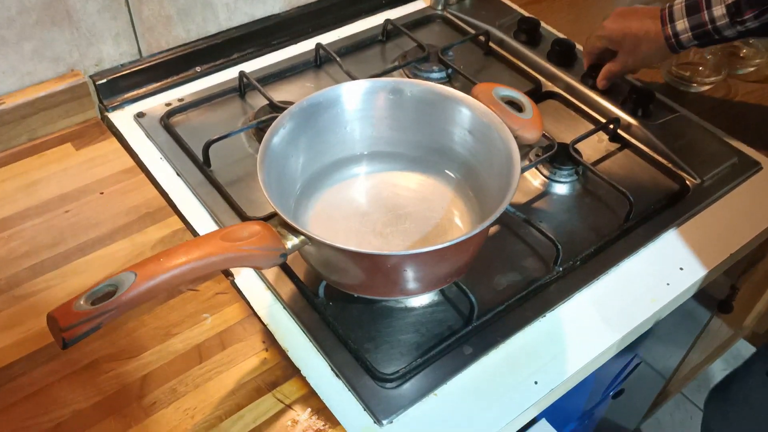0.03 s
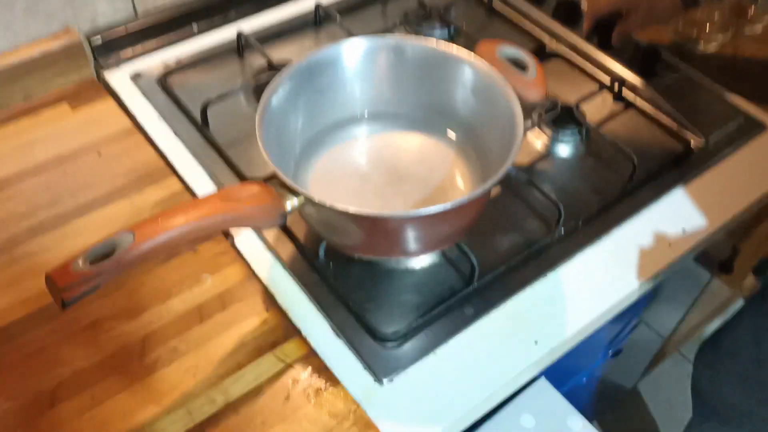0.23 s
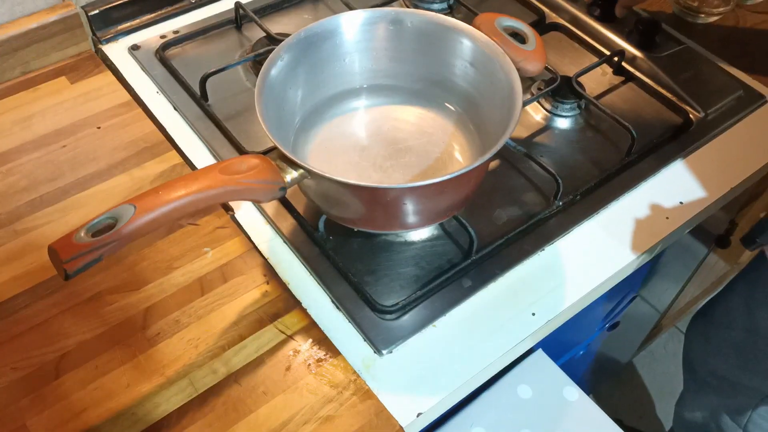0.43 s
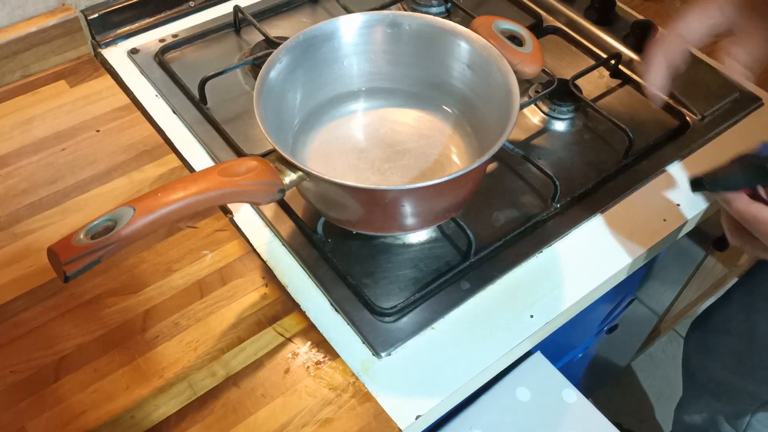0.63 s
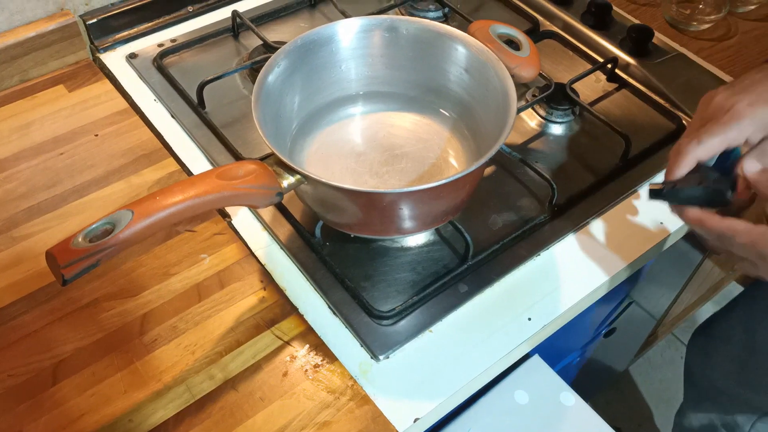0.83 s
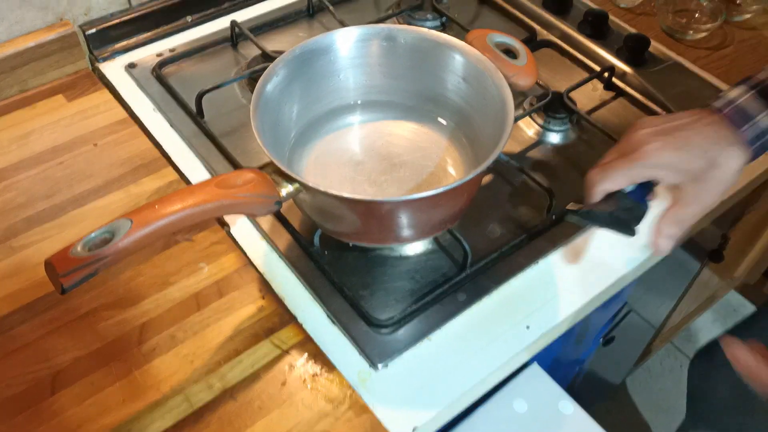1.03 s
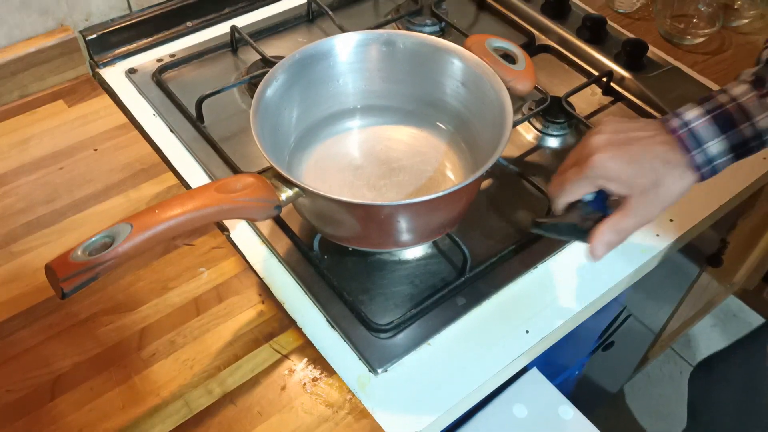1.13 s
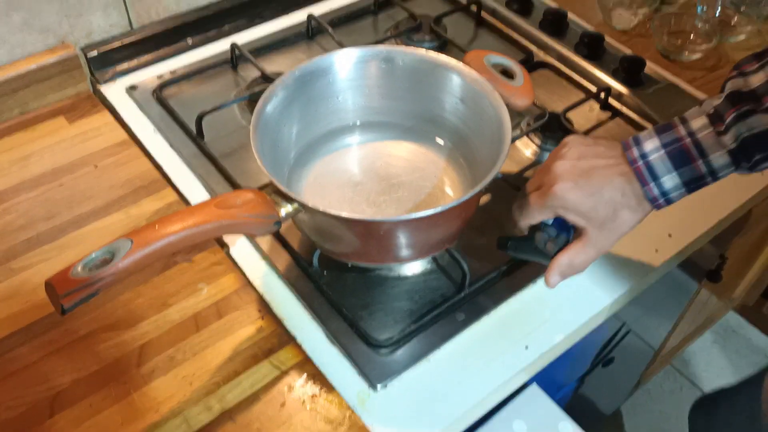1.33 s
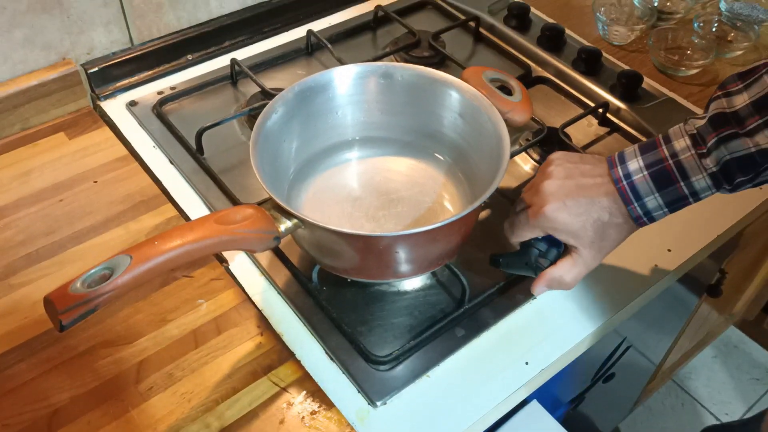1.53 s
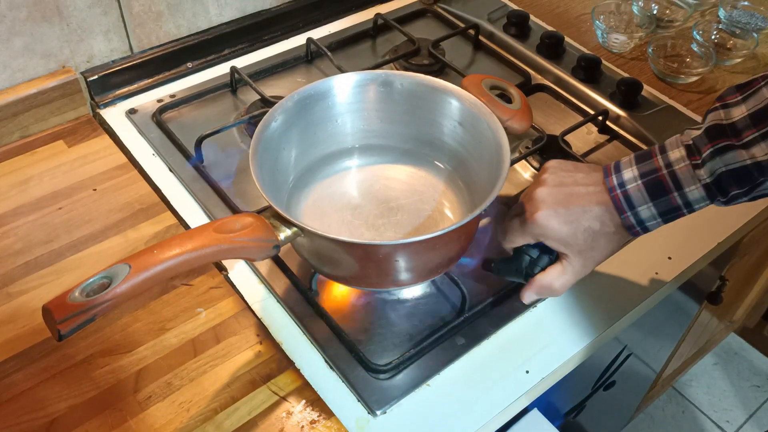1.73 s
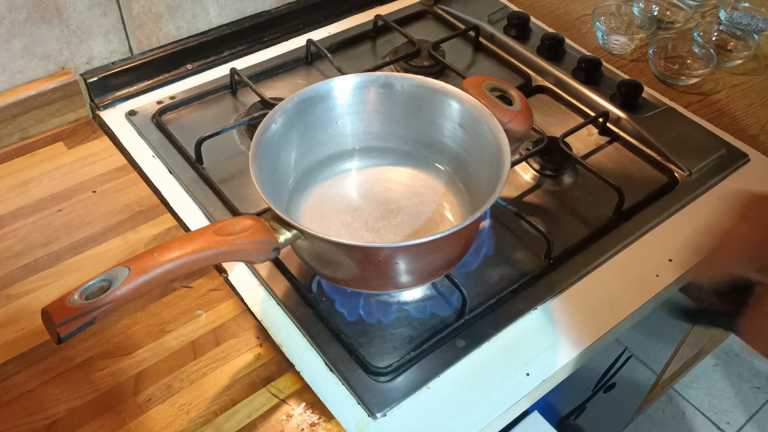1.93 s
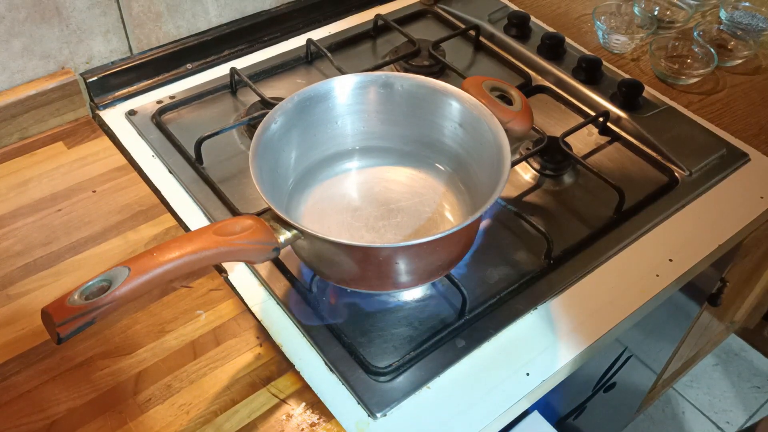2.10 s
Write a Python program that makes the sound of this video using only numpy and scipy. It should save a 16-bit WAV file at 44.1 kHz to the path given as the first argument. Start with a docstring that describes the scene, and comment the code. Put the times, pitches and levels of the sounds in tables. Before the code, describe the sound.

Gas stove ignition: knob clicks, steady gas hiss, a loud lighter snap, then a brief flaring whoosh

```python
"""In a small kitchen, a gas ring under an empty saucepan is lit.
The knob clicks open and gas hisses through the burner: coloured noise with wavering resonances.
A hand lighter is cocked and fires one sharp spark: a click with close echoes and ringing metal.
The gathered gas flares with a low whump, made of noise in the slow resonances of the air.
It settles to a soft flame: hiss whose resonances sink in pitch, over a fluttering rumble."""
import sys
import numpy as np
from scipy import signal
from scipy.fft import rfft, irfft
from scipy.io import wavfile
from scipy.ndimage import uniform_filter1d, map_coordinates

SR = 44100
rng = np.random.default_rng(int(sys.argv[2]) if len(sys.argv) > 2 else 0)


def log_audio(samples):
    """Write samples as a 16-bit WAV file to the path given in sys.argv[1]."""
    # one column per channel
    frames = np.atleast_2d(samples).T
    # limit to full scale, then quantise
    limited = np.clip(frames, -1, 1)
    pcm = np.round(limited * 32767).astype(np.int16)
    wavfile.write(sys.argv[1], SR, pcm)


N = 95432
T = np.arange(N) / SR  # time of each sample, in seconds
SIZE = 2 ** 17  # length used for filtering, in samples
HZ = np.maximum(np.arange(SIZE // 2 + 1) * SR / SIZE, 1)  # frequencies of the filters

# How the kitchen's echo fades: pitch_hz, t60_s (time to fall by 60 dB)
ROOM_FADE = [(200, .35), (1000, 0.37), (4000, 0.31), (8000, 0.29), (15000, 0.27)]
ROOM_BUILD_S = 0.00075
# How alike left and right are: pitch_hz, likeness (1 = the same, 0 = unrelated)
LIKENESS = [(150, .975), (280, .88), (600, .6), (1300, .45), (2500, .05), (15000, -.1)]
QUIET_LIKENESS, BUMP_LIKENESS = 0.48, 0.64  # share of that likeness kept by quiet noise and by bumps
# Background sound of the quiet kitchen: pitch_hz, level_db
QUIET_COLOUR = [(25, -4), (50, -1), (90, -3), (300, 0), (700, -3.5), (1500, -7.5), (3500, -5),
                (5000, -19.5), (8000, -11.5), (15000, -21.5)]
QUIET_DB = -67.5

# Clicks and knocks of knob and lighter: start_s, level_db, bass_db, treble_db, rattle_t60_s, room_db
CLICKS = [(0.0097, -23, 1.5, -4, 0.078, 6.5), (0.1223, -15.5, 10, -12, 0.027, -11),
          (0.153, -28.5, 24, -14, 0.025, -2), (0.1773, -30.5, -3, 7.5, 0.039, -0.5),
          (0.6358, -30, 6, -17, 0.02, 0), (0.7282, -13.5, 8, 3, 0.039, -4.5),
          (0.887, -25.5, 7, -24, 0.016, -12), (1.031, -34.5, 23, -21, 0.031, -4),
          (1.7558, -21, 1, 11.5, 0.014, 0.5), (2.072, -37, 1, -4, 0.02, -2)]
# Colour shared by all clicks: pitch_hz, level_db
CLICK_COLOUR = [(60, -4), (200, -11), (420, -3.5), (850, -6.5), (1500, 0.5), (2200, -3.5), (3200, 4.5),
                (5000, -5), (8000, -1.5), (11000, -8), (15000, -12.5)]
BASS_HZ, TREBLE_HZ = 586, 4930  # where the bass and treble settings take hold
RATTLE_GRAIN_DB, RATTLE_GRAIN_HZ = 4, 450

# Soft bumps of handling: start_s, level_db, t60_s
BUMPS = [(.118, -60, 0.32), (.728, -67, 0.25), (1.03, -56, 0.34), (1.42, -70, 0.57)]
# Colour of the bumps: pitch_hz, level_db
BUMP_COLOUR = [(25, -12), (60, -4), (95, 4.5), (160, -13), (400, -18), (2000, -60)]
BUMP_RISE_S = 0.03
# Hollow booms after knob and lighter are worked: start_s, level_db
BOOMS = [(0.015, -59), (.158, -71), (0.733, -66.5)]
BOOM_HZ, BOOM_WIDTH_HZ, BOOM_T60_S = 284, 186, 0.49

# Gas flow before it lights: time_s, level_db
GAS_FLOW = [(.17, -21), (.22, -4), (.335, -0.5), (.37, 3.5), (.48, 3), (.56, 2.5), (.8, 0.5), (1.0, -1.5),
            (1.2, -3), (1.4, -3.5), (1.47, 0.5), (1.55, 5.5), (1.62, -3), (1.7, -31)]
# Colour of the hiss from the jet: pitch_hz, level_db
JET_COLOUR = [(80, 1.5), (300, -3), (700, -0.5), (1300, -7), (1800, -1), (2800, -5.5), (3900, -4),
              (4300, -7.5), (4600, -21), (5200, -6.5), (5700, -18), (6500, -5.5), (7400, -5), (8500, -4),
              (10500, -8), (14500, -9), (16000, -19)]
# Resonances of the burner's tube and ports: pitch_hz, width_hz, level_db
PORTS = [(1039, 244, -3), (2233, 82, 1), (3075, 63, -5), (3560, 89, -1), (6570, 170, -10.5),
         (7700, 110, -10.5), (8570, 244, -5.5)]
JET_DB, PORT_DB = -62, -62
# Where the hiss sits: pitch_hz, left_minus_right_db
GAS_PAN = [(600, 0.5), (1150, -2.5), (2200, 2), (4200, -2), (6500, 4.5), (8700, -10), (10000, -5.5),
           (13000, 3)]
WAVER_SHARE, WAVER_HZ = 0.009, 25  # the pitch of the resonances wavers
GAS_FLUTTER_DB, FLUTTER_HZ = 1.8, 25  # the flare's roar flutters at this rate too
# The valve sings while half open: time_s, level_db
VALVE_SONG = [(.17, -78), (.23, -60), (.33, -63.5), (.39, -61.5), (.48, -63), (.55, -86), (.7, -93)]
VALVE_HZ, VALVE_WIDTH_HZ = 1030, 330

SPARK_S, SPARK_DB, SPARK_ROOM_DB = 1.5624, 10, 7
PRESS_LEAD_S, PRESS_DB = 0.0017, -25  # the lighter's trigger trips just before the spark
# Colour of the spark's crack on each side: pitch_hz, left_db, right_db
SPARK_COLOUR = [(200, -50, -35), (800, -35, -43), (1650, -31, -4.5), (2180, -13, -16), (3250, -4, -7.5),
                (4480, 0.5, -11), (5400, -6.5, -20), (6670, -2.5, -28), (7830, 9.5, 13.5), (8820, -25, -11),
                (10050, -1, 9), (10450, -19, -22), (12200, -11, -15), (13600, 0.5, -25), (15500, -27, -38)]
# Echoes off hob and pan: delay_s, left_gain, right_gain (a negative gain flips the echo)
SPARK_ECHOES = [(.00036, 1.35, 1), (.00058, -0.22, 0.76), (.0009, 0.21, 0.26), (.0016, .2, .55),
                (.0027, 0.61, 0.012)]
RIGHT_LAG_S = 0.00003  # the crack comes later on the right
# Metal set ringing by the snap: pitch_hz, level_db, t60_s
METAL = [(3520, -2, .18), (3780, -1, .18), (4150, -4, .3), (4636, -6, .35), (5276, -7, .35), (6538, 1, .25),
         (6810, -1, .2), (7570, 1, .28), (8080, 3, .19), (8465, -1, .25), (9190, -3, .2), (9485, -3, .25),
         (9825, -4, .2), (12600, -10, .28)]
METAL_DB = -42.5
# Colour of the spark's sound in the room: pitch_hz, level_db
SPARK_TAIL = [(200, -9), (520, -9.5), (850, -22), (1120, -15.5), (1700, -8.5), (2400, -7.5), (3200, -8.5),
              (4000, 1), (5200, -5.5), (6700, -0.5), (8100, 1), (8900, -2), (9800, -2), (11500, -10),
              (12600, -7.5), (15000, -12.5)]

# Strength of the flare: time_s, level_db
FLARE = [(1.55, -49), (1.572, -18), (1.596, -14.5), (1.607, -0.5), (1.632, 1.5), (1.692, 0.5), (1.712, -7),
         (1.735, -14.5), (1.775, -13), (1.84, -33.5), (1.98, -32.5), (2.16, -52)]
# Resonances of the air under the pan and in the room: pitch_hz, width_hz, level_db
AIR = [(87, 16, 0), (136, 15, 0), (180, 16, -6), (254, 12, -9.5), (284, 10, -8), (379, 10, -17),
       (413, 10, -16), (465, 12, -16), (493, 10, -13), (1615, 14, -19), (1708, 14, -20), (1790, 12, -19)]
# Colour of the flare's roar: pitch_hz, level_db
ROAR_COLOUR = [(40, -18), (100, 11), (300, 0), (560, 2), (800, -2), (1300, -0.5), (1780, -1.5),
               (1950, -14.5), (2700, -5.5), (3300, -12.5), (4200, -19), (6000, -28), (15000, -46)]
WHUMP_DB, ROAR_DB, THUD_DB = -35, -40, -49
ROAR_LEAD_S, THUD_LAG_S = 0.0055, 0.023  # the roar comes early, the deepest thud comes late
ROAR_FLUTTER_DB = 2.5
ROAR_THROB = 0.24  # share by which the roar pulses with the air under the pan
THUD_HZ, THUD_WIDTH_HZ = 40.7, 15

# Hiss of the lit ring: time_s, level_db
FLAME = [(1.58, -90), (1.64, -51), (1.75, -56.5), (1.86, -56.5), (1.95, -59), (2.03, -61), (2.16, -62.5)]
# Its resonances at the time SETTLED_S: pitch_hz, width_hz, level_db
FLAME_PORTS = [(1117, 100, 2.5), (1457, 300, 2.5), (2530, 120, 2.5), (3790, 160, -1.5), (6250, 220, -8)]
SETTLED_S, SINK_OCTAVES_PER_S = 2.05, 0.6
# Colour of the hiss around those resonances: pitch_hz, level_db
FLAME_HISS = [(300, -3.5), (1000, 4.5), (2000, -3.5), (3000, -3), (4100, -0.5), (4600, -11), (5500, -19),
              (6300, -2), (8500, -8), (11000, -10.5), (14500, -9.5), (16000, -23)]
FLAME_HISS_DB = -2.5  # compared with the resonances
FLAME_JET_HZ, FLAME_JET_WIDTH_HZ, FLAME_JET_DB = 8600, 1200, -69.5  # the cool jet keeps its pitch
# Rumble of the lit ring: time_s, level_db
RUMBLE = [(1.7, -87), (1.8, -59), (1.85, -61.5), (1.93, -58.5), (1.99, -64.5), (2.07, -58.5), (2.13, -53.5)]
# Colour of the rumble: pitch_hz, level_db
RUMBLE_COLOUR = [(30, -11), (60, -6), (90, -4), (140, 6.5), (200, -12), (275, -2), (350, -13), (490, -6.5),
                 (650, -12), (1000, -17), (2000, -28), (8000, -60)]
RUMBLE_FLUTTER_DB, RUMBLE_FLUTTER_HZ = 2, 35
RUMBLE_AIR_DB = -4.5  # the rumble also sounds the air under the pan

CHIRP_S, CHIRP_LENGTH_S, CHIRP_DB = 1.663, 0.007, -46.5
CHIRP_HZ, CHIRP_WIDTH_HZ = 3020, 130
LOW_CUT_HZ, CUTOFF_HZ = 34, 15400


def from_db(db):
    """Turn decibels into a gain."""
    return 10 ** (np.asarray(db) / 20)


def rms_one(x):
    """Scale a signal to an average strength (rms) of 1."""
    return x / np.sqrt(np.mean(x ** 2) + 1e-20)


def level(rows, lag=0):
    """Gain over time from rows of time_s, level_db; a positive lag in seconds makes it later."""
    return from_db(np.interp(T - lag, *np.transpose(rows)))


def at_hz(points, hz=HZ):
    """Read a table between its pitches, spaced by ratio as the ear hears them."""
    pitch, value = np.transpose(points)
    return np.interp(np.log(hz), np.log(pitch), value)


def dying(t, t60):
    """Smooth fade that starts at t = 0 and falls by 60 dB in t60 seconds."""
    return (t >= 0) * np.exp(-np.log(1000) * np.maximum(t, 0) / t60)


def wander(rate_hz):
    """Smooth random curve of spread 1, with little movement faster than the given rate."""
    smooth = rfft(rng.standard_normal(SIZE)) / (1 + (HZ / rate_hz) ** 4)
    return rms_one(irfft(smooth)[:N])


def colour(x, db):
    """Filter to the given dB at each frequency, sounding as early as it can (minimum phase)."""
    cepstrum = irfft(np.log(from_db(db)))
    # folding onto positive times keeps the filter from sounding before its input
    cepstrum[1:SIZE // 2] *= 2
    cepstrum[SIZE // 2 + 1:] = 0
    return irfft(rfft(x, SIZE) * np.exp(rfft(cepstrum)))[..., :N]


def resonances(rows):
    """Response in dB of steep-sided peaks, from rows of pitch_hz, width_hz, level_db."""
    power = 0
    for hz, width, db in rows:
        offset = (HZ - hz * hz / HZ) / (2 * width)
        power = power + from_db(db) ** 2 / (1 + offset ** 2 * 2) ** 2
    return 10 * np.log10(power + 1e-12)


def noise(db, pan_db=0, likeness=1):
    """Stereo noise of a given colour and balance, most alike on both sides in the bass; rms 1."""
    mid, side = rfft(rng.standard_normal((2, SIZE)))
    alike = np.clip(likeness * at_hz(LIKENESS), -1, 1)
    sign = np.array([[1], [-1]])  # left, right
    both = np.sqrt(1 + alike) * mid + np.sqrt(1 - alike) * side * sign
    return rms_one(irfft(both * from_db(db + sign * pan_db / 2))[:, :N])


def evened(x, span_s):
    """Hold the short-term level of a narrow noise steady."""
    power = uniform_filter1d(np.mean(x ** 2, axis=0), max(int(span_s * SR), 1))
    return x / np.sqrt(power + 1e-9)


def bent(x, speed):
    """Shift the pitch of stereo noise by playing it at a speed that moves in time."""
    place = np.cumsum(speed)
    return np.array([map_coordinates(side, [place], order=3, mode="wrap") for side in x])


def room_tail(start_s):
    """The kitchen's scattered echo of a unit click: noise dying at its own pace in each pitch band."""
    t = T - start_s
    white = rfft(noise(0 * HZ), SIZE)
    out = 0
    edges = [1, 400, 1500, 3000, 6000, 11000, SR / 2]
    for low, high in zip(edges, edges[1:]):
        band = irfft(white * ((HZ >= low) & (HZ < high)))[:, :N]
        out = out + band * dying(t, at_hz(ROOM_FADE, (low + high) / 2))
    build = 1 - np.exp(-np.maximum(t, 0) / ROOM_BUILD_S)
    return rms_one(out * build) / np.sqrt(N)


def quiet_kitchen():
    """Steady, faint noise, coloured like the quiet kitchen."""
    return from_db(QUIET_DB) * noise(at_hz(QUIET_COLOUR), likeness=QUIET_LIKENESS)


def clicks():
    """Each click is a brief, grainy rattle of small parts: fading noise, followed by the room."""
    out = 0
    bass = 1 / (1 + (HZ / BASS_HZ) ** 2)
    treble = 1 / (1 + (TREBLE_HZ / HZ) ** 4)
    for s, db, bass_db, treble_db, t60, room_db in CLICKS:
        grain = from_db(RATTLE_GRAIN_DB * wander(RATTLE_GRAIN_HZ))
        rattle = rms_one(noise(0 * HZ) * grain * dying(T - s, t60)) / np.sqrt(N)
        click = rattle + from_db(room_db) * room_tail(s)
        out = out + colour(click, db + at_hz(CLICK_COLOUR) + bass_db * bass + treble_db * treble)
    return out


def bumps():
    """Dull knocks of handling in low noise, and hollow booms in noise around one resonance."""
    swell = 0
    for s, db, t60 in BUMPS:
        rise = np.clip((T - s) / BUMP_RISE_S, 0, 1)
        swell = swell + from_db(db) * dying(T - s, t60) * rise
    boom = sum(from_db(db) * dying(T - s, BOOM_T60_S) for s, db in BOOMS)
    dull = evened(noise(at_hz(BUMP_COLOUR), likeness=BUMP_LIKENESS), span_s=0.02)
    hollow = noise(resonances([(BOOM_HZ, BOOM_WIDTH_HZ, 0)]), likeness=BUMP_LIKENESS)
    return swell * dull + boom * hollow


def gas():
    """Unlit gas hisses from the jet and sounds the burner's resonances, which waver in pitch and level."""
    pan = at_hz(GAS_PAN)
    ports = noise(resonances(PORTS), pan, QUIET_LIKENESS)
    ports = bent(ports, 1 + WAVER_SHARE * wander(WAVER_HZ))
    port_gain = from_db(PORT_DB + GAS_FLUTTER_DB * wander(FLUTTER_HZ))
    jet = from_db(JET_DB) * noise(at_hz(JET_COLOUR), pan, QUIET_LIKENESS)
    valve = level(VALVE_SONG) * noise(resonances([(VALVE_HZ, VALVE_WIDTH_HZ, 0)]))
    return level(GAS_FLOW) * (jet + port_gain * ports) + valve


def spark():
    """The trigger trips; then one crack with close echoes, ringing metal and the room's tail."""
    trigger = colour(room_tail(SPARK_S - PRESS_LEAD_S), PRESS_DB + at_hz(CLICK_COLOUR))
    crack = np.zeros((2, N))
    start = int(SPARK_S * SR)
    crack[:, start] = 1
    for delay, left_gain, right_gain in SPARK_ECHOES:
        crack[:, start + int(delay * SR)] += left_gain, right_gain
    sides = np.array(SPARK_COLOUR)
    left, right = [
        colour(rms_one(crack[k]) / np.sqrt(N), SPARK_DB + at_hz(sides[:, [0, k + 1]]))
        for k in range(2)
    ]
    lag = np.exp(-2j * np.pi * HZ * RIGHT_LAG_S)  # a delay finer than one sample
    direct = np.array([left, irfft(rfft(right, SIZE) * lag)[:N]])
    t = T - SPARK_S
    ring = 0
    for hz, db, t60 in METAL:
        tone = np.sin(2 * np.pi * (hz * t + rng.random((2, 1))))
        ring = ring + from_db(METAL_DB + db) * dying(t, t60) * tone
    tail = colour(room_tail(SPARK_S), SPARK_ROOM_DB + at_hz(SPARK_TAIL))
    return trigger + direct + ring + tail


def flare():
    """The flame front roars round the ring and shakes the air under the pan; the deepest mode lags."""
    whump = from_db(WHUMP_DB) * evened(noise(resonances(AIR)), span_s=0.0407)
    roar = from_db(ROAR_DB + ROAR_FLUTTER_DB * wander(FLUTTER_HZ)) * noise(at_hz(ROAR_COLOUR))
    roar = roar * (1 + ROAR_THROB * rms_one(whump))
    deep = noise(resonances([(THUD_HZ, THUD_WIDTH_HZ, 0)]))
    thud = from_db(THUD_DB) * evened(deep, span_s=0.04)
    burst = level(FLARE, -ROAR_LEAD_S) * roar + level(FLARE) * whump + level(FLARE, THUD_LAG_S) * thud
    return burst * np.clip((T - SPARK_S) / 0.0066, 0, 1)  # silent until the spark


def flame():
    """The lit ring hisses and rumbles; its resonances, raised by the flare's heat, sink as it settles."""
    lit = T > SPARK_S
    hot = noise(resonances(FLAME_PORTS)) + from_db(FLAME_HISS_DB) * noise(at_hz(FLAME_HISS))
    sinking = 2 ** (-SINK_OCTAVES_PER_S * (T - SETTLED_S))
    hiss = level(FLAME) * bent(hot, sinking * lit)
    jet_peak = resonances([(FLAME_JET_HZ, FLAME_JET_WIDTH_HZ, 0)])
    jet = from_db(FLAME_JET_DB) * noise(jet_peak, at_hz(GAS_PAN))
    rumble = noise(at_hz(RUMBLE_COLOUR)) + from_db(RUMBLE_AIR_DB) * noise(resonances(AIR))
    flutter = from_db(RUMBLE_FLUTTER_DB * wander(RUMBLE_FLUTTER_HZ))
    return (hiss + jet + level(RUMBLE) * flutter * evened(rumble, span_s=0.089)) * lit


def chirp():
    """A narrow whistle of the burner, made of noise, that swells and dies within the flare."""
    swell = np.exp(-0.5 * ((T - CHIRP_S) / CHIRP_LENGTH_S) ** 2)
    whistle = evened(noise(resonances([(CHIRP_HZ, CHIRP_WIDTH_HZ, 0)])), span_s=0.017)
    return from_db(CHIRP_DB) * swell * whistle


def scene():
    """All sources over the quiet of the kitchen."""
    handling = clicks() + bumps()
    burner = gas() + spark() + flare() + flame() + chirp()
    return quiet_kitchen() + handling + burner


def record(dry):
    """The deepest bass is rolled off and the top is cut steeply."""
    low_cut = signal.butter(3, LOW_CUT_HZ, "high", fs=SR, output="sos")
    top_cut = signal.ellip(10, 0.1, 70, CUTOFF_HZ, fs=SR, output="sos")
    return signal.sosfilt(top_cut, signal.sosfilt(low_cut, dry))


dry = scene()
out = record(dry)
log_audio(out)
```